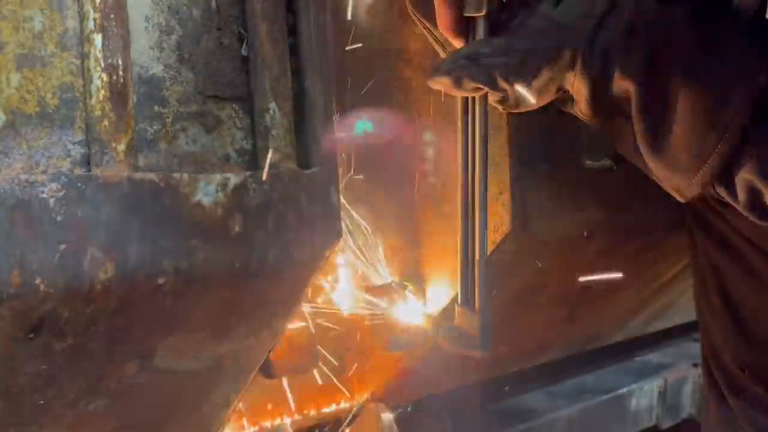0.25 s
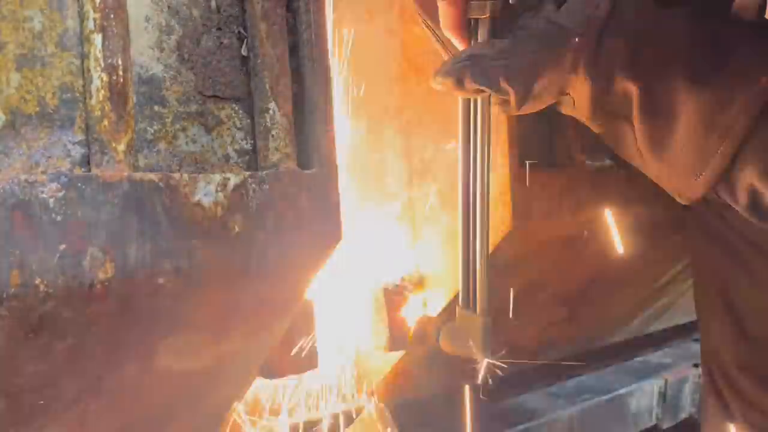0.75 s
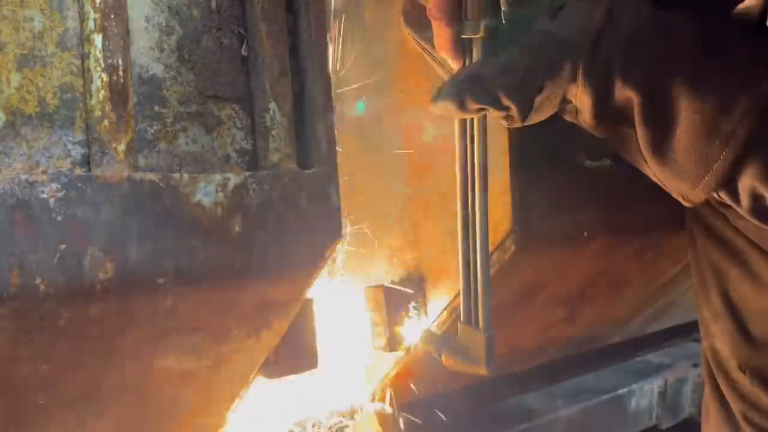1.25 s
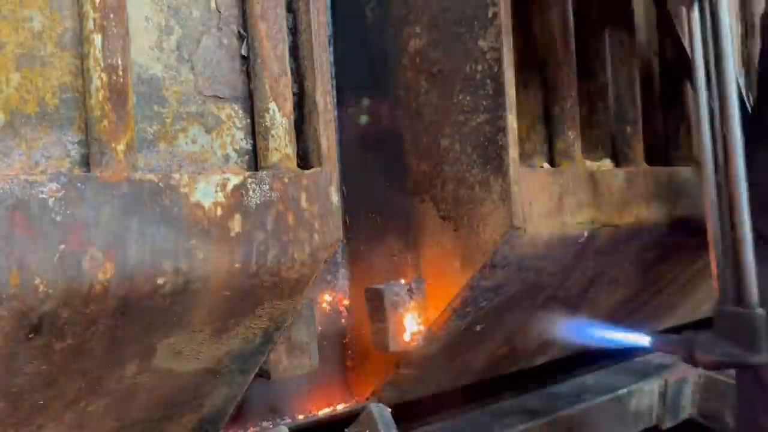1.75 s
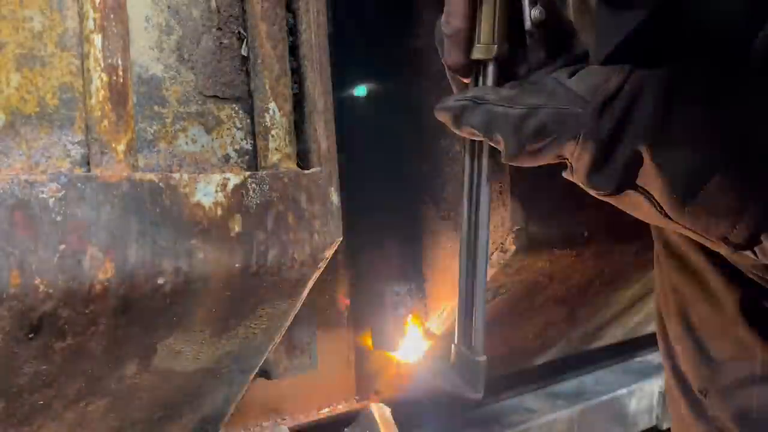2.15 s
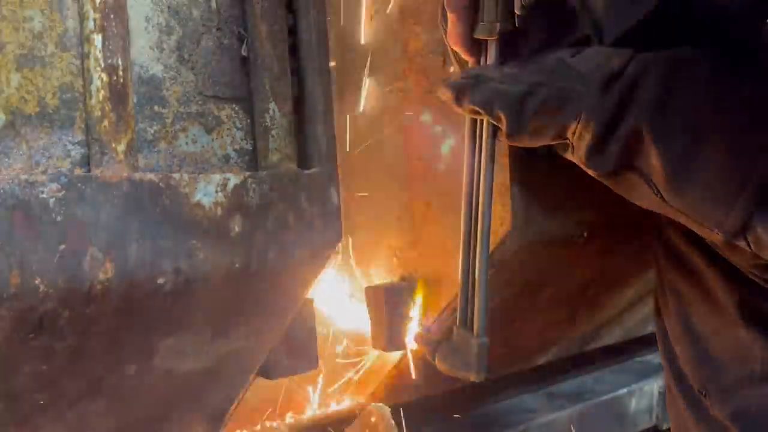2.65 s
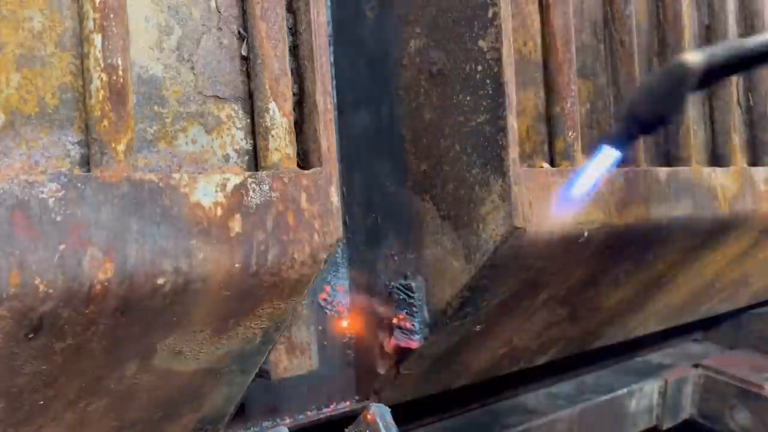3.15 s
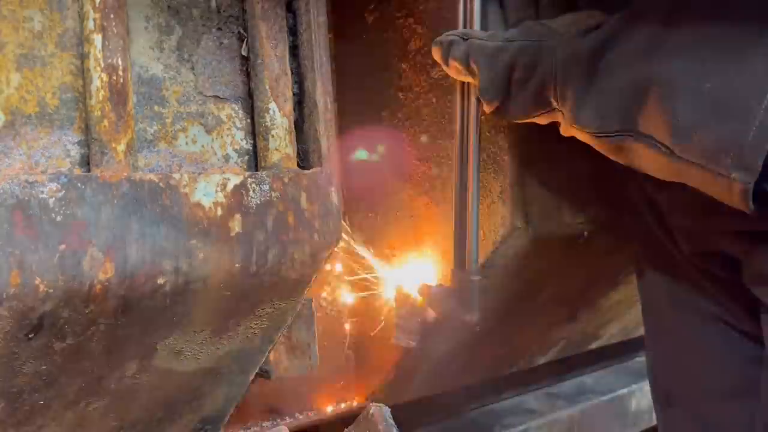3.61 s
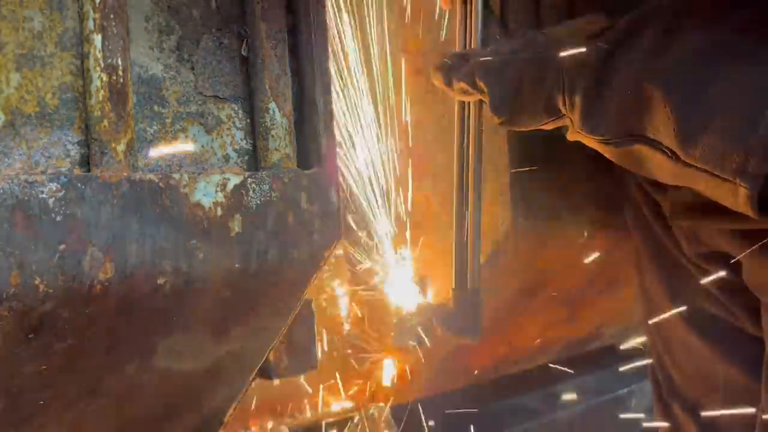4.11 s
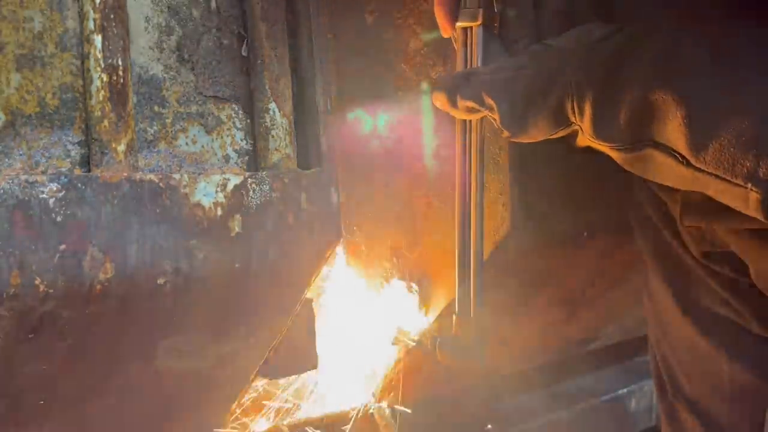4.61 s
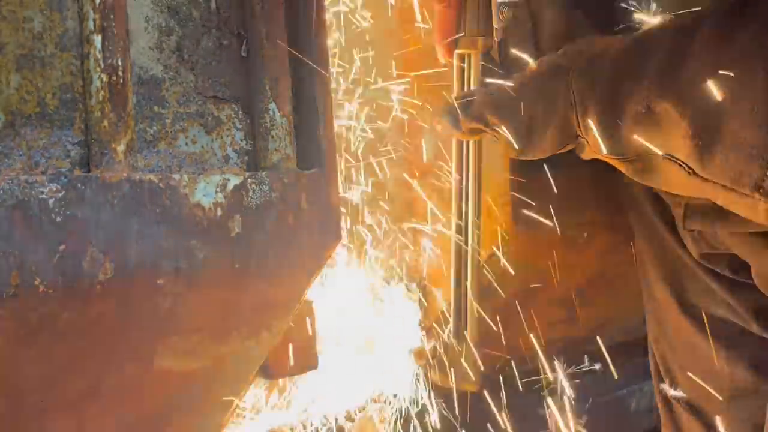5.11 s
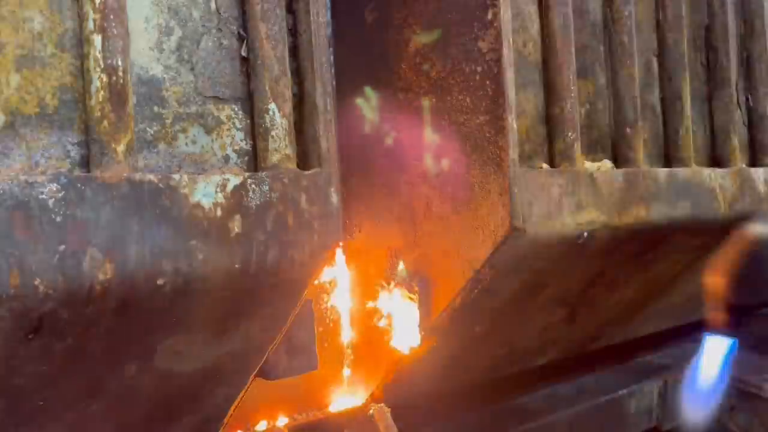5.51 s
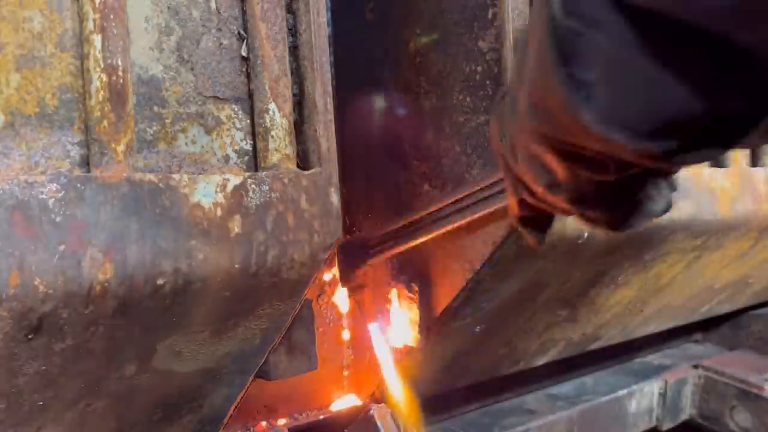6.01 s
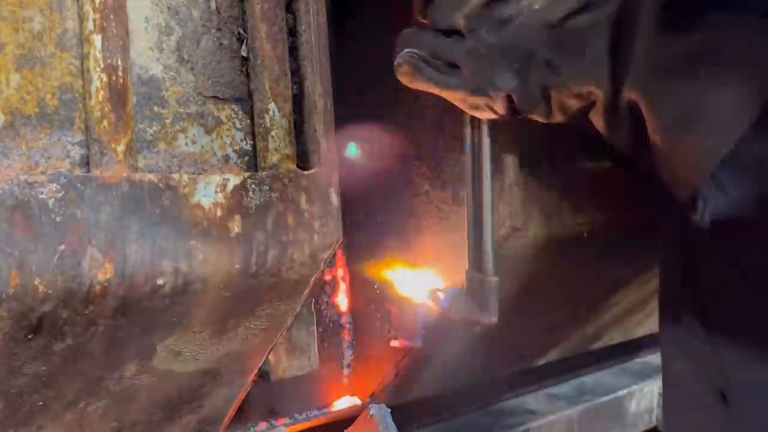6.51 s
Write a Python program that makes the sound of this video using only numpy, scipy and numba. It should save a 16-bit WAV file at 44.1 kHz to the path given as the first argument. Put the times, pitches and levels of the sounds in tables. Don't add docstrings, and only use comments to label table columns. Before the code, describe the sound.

A gas cutting torch hisses without pause close to a phone microphone, bright and thin in the bass. At 0.23 s a tight cluster of backfire pops snaps, ringing the steel briefly. Short breathy whistles rise near 0.5 and 0.75 s, then faint wavering tones and soft slag sputters run beneath the hiss. At 1.7 s the torch is pulled clear and the hiss opens with a swishing echo; whistles chirp at 2.2 s as cutting resumes. It draws away again around 2.8 to 3.25 s, then a singing tone swells and a longer whistle climbs from 3.57 s. Hard cracks hit at 3.95 and 4.02 s, another at 4.64 s, with sputtering around them. From 5.4 s the flame plays in the open, louder, airy and shifting, with sharp tiny ticks at 6.03 and 6.26 s. It re-enters the slot about 6.5 s, singing, then whistling nearly level from 6.7 s.

```python
import sys
import numpy as np
from scipy import signal
from scipy.fft import rfft, irfft, next_fast_len
from scipy.io import wavfile
from scipy.ndimage import uniform_filter1d, map_coordinates
from numba import njit

SR = 44100
rng = np.random.default_rng(int(sys.argv[2]) if len(sys.argv) > 2 else 0)


def bounce(signal):
    frames = np.transpose(np.atleast_2d(signal))
    limited = np.clip(frames, -1, 1)
    pcm = np.round(limited * 32767).astype(np.int16)
    wavfile.write(sys.argv[1], SR, pcm)


def magnitude_from_level(level_db):
    exponent = np.asarray(level_db, float) / 20
    return 10 ** exponent


N = 298113
TIME = np.arange(N) / SR
SIZE = next_fast_len(N + 8192)
HZ = np.maximum(np.arange(SIZE // 2 + 1) * SR / SIZE, 1)


def unit(x):
    return x / np.sqrt(np.mean(np.atleast_2d(x)[0] ** 2))


def shape(x, gain):
    return irfft(rfft(x, SIZE) * gain, SIZE)[..., :N]


def spectrum(points):
    hz, db = np.transpose(points)
    return magnitude_from_level(np.interp(np.log(HZ), np.log(hz), db))


@njit
def svf(x, hz, width):
    y, band, low = np.empty(len(x)), 0., 0.
    for i in range(len(x)):
        g = np.tan(np.pi * hz[i] / SR)
        k = width / hz[i]
        v = (band + g * (x[i] - low)) / (1 + g * (g + k))
        band, low, y[i] = 2 * v - band, low + 2 * g * v, k * v
    return y


def walk(rate):
    k = int(SR / rate)
    steps = np.repeat(rng.standard_normal(N // k + 1), k)
    return 0.764 * uniform_filter1d(uniform_filter1d(steps, k), k)[:N]


# start in seconds, length in seconds, lowest first notch of the
# plate echo in Hz, echo share from 0 to 1, left minus right in dB.
DRAWN_CLEAR = [
    (1.66, .26, 5800, .5, -2),
    (2.78, .27, 4550, .55, -2.5),
    (2.94, .35, 4450, .55, -2.5),
    (5.37, .29, 3950, .45, -3),
    (5.58, .9, 6900, .35, .5),
    (5.82, .32, 4400, .3, .1),
    (6.3, .19, 6100, .45, .1),
]


def reach():
    draw_s = .04
    start, length = np.transpose(DRAWN_CLEAR)[:2, :, None]
    ways = (TIME - start, start + length - TIME)
    out = np.prod([1 - np.exp(-np.maximum(t, 0) / draw_s) for t in ways], axis=0)
    return out / out.max(axis=1, keepdims=True)


def plate_echo(x):
    at_plate_hz = 9500
    notch_hz, share = np.transpose(DRAWN_CLEAR)[2:4, :, None]
    out = reach()
    share = np.max(share * np.sqrt(out), axis=0) * (1 + .3 * walk(25))
    delay_s = np.max(1 / at_plate_hz + (1 / notch_hz - 1 / at_plate_hz) * out, axis=0)
    lag = SR * delay_s * (1 + .025 * walk(30) + .05 * walk(9))

    def delayed(path):
        return np.array([map_coordinates(row, [np.arange(N) - path * lag], order=2) for row in x])

    echoed = x - .8 * share * delayed(1) + .45 * share * delayed(1.7) - .4 * share * delayed(2.6)
    return echoed / np.sqrt(1 + .75 * share ** 2)


# start in seconds, gas level in dB, depth in the slot
# from 0 to 1, steel burning in dB.
MOVES = [(0, -39, 0.7, -5), (.26, -43.5, 0.64, -6.5), (.33, -44.5, 1, -6.5), (.52, -43.5, .97, -7.5),
         (.735, -39, 0.9, -5.5), (.84, -40.5, 0.72, -6.5), (1.2, -41, 0.68, -6.5), (1.68, -37, 0.4, -13),
         (1.9, -40, 0.7, -8), (1.98, -33.5, .43, -14), (2.05, -37, 0.63, -10.5), (2.2, -38.5, 0.56, -7.5),
         (2.38, -39.5, 0.86, -4.5), (2.53, -40, 0.68, -8.5), (2.81, -39, 0.32, -14), (3.05, -38, 0.25, -15),
         (3.17, -36, 0.34, -14.5), (3.26, -37, .93, -12.5), (3.58, -34.5, 0.72, -16.5),
         (3.7, -37, .64, -15), (3.83, -40, 0.83, -7), (4.23, -40.5, 0.75, -9), (4.92, -35.5, 0.51, -10.5),
         (5.35, -38.5, 0.56, -15.5), (5.5, -37, 0.26, -16), (5.76, -35.5, 0.5, -13), (6.14, -35, 0.36, -13),
         (6.32, -34.5, 0.43, -14.5), (6.47, -37, 0.93, -11.5), (6.72, -35, 0.87, -14)]
# start in seconds, length in seconds, gain in dB.
LEVER = [
    (0.244, .07, 4.5),
    (0.455, 0.29, 3.5),
    (1.69, 0.3, 2.5),
    (1.926, 0.275, -4.5),
    (2.298, 0.22, 3.5),
    (3.58, 0.37, 4.5),
    (3.974, 0.21, 3.5),
    (6.132, .17, 4),
    (6.702, .1, 3.5),
]
# centre in seconds, half length in seconds, gain in dB, share in the low
PUFFS = [(0.018, 0.076, 2.5, 1), (.75, 0.015, 1.5, 0.9), (1.7, 0.011, 2.5, 0.5), (1.812, 0.067, -2, 1),
         (1.864, 0.049, 3.5, 0.8), (1.91, 0.013, -7, .3), (2.238, 0.027, 4, 0.8), (2.684, 0.035, -3, 0.9),
         (2.74, 0.018, 6, 0.3), (2.782, 0.0078, -8, 0), (2.99, 0.035, -3.5, 0.3), (3.272, 0.036, 3.5, 0.8),
         (3.32, 0.012, -6, 0.4), (3.38, 0.034, 2, 0.8), (3.446, 0.02, -3.5, .6), (3.905, .03, -4, 0.4),
         (4.066, 0.067, 1, 1), (4.61, .03, -3, 0), (4.737, 0.037, 3, 0.6), (4.82, 0.04, -1.5, 1),
         (4.987, 0.05, -1, 1), (5.135, 0.092, -2.5, 1), (5.33, .03, -2, .8), (5.367, 0.01, -11, 0.2),
         (5.39, 0.027, 3.5, 1), (5.984, 0.0088, 6.5, 0.65), (6.257, 0.019, 2, 0.7),
         (6.442, 0.047, 2.5, 0.9), (6.508, 0.028, -3.5, 0.8), (6.594, 0.016, 2, .8)]
# roar, rush, sizzle, hiss in dB.
REGISTER_DB = [-0.07, -3.5, 2.5, 2.5]
DEPTH_DB = [-0.17, 4.5, -9, -1.1]


def register_levels():
    move_samples = int(0.025 * SR)
    starved_db, relight_s = -7.5, 0.021
    start, *held = np.transpose(MOVES)
    move = np.searchsorted(start, TIME, side="right") - 1
    gas, depth, burn = uniform_filter1d(np.array(held)[:, move], move_samples)
    starved = [(TIME > s) * np.exp(-abs(TIME - s) / relight_s) * magnitude_from_level(db) for s, db, *_ in CRACKS]
    gas = gas + starved_db * np.max(starved, axis=0)
    db = gas + np.array(REGISTER_DB)[:, None] + np.outer(DEPTH_DB, depth)
    db[0] += burn
    jet = sum(gain * ((TIME > s) & (TIME < s + length)) for s, length, gain in LEVER)
    db[3] += uniform_filter1d(jet, move_samples)
    for s, half, gain, low in PUFFS:
        db += np.outer([low, low, 1, 1], gain * np.exp(-((TIME - s) / half) ** 2))
    return db


EDGES_HZ = [1600, 5200, 10500]
# frequency in Hz, density in dB per Hz.
COLOUR = [(150, -12.5), (450, -7), (633, -2.5), (839, -2), (1930, -7.5), (2960, -4), (4100, -3.5),
          (5130, -2.5), (5950, 2.5), (8120, 0), (14300, 8.5), (15600, 7)]
# frequency in Hz, side minus mid in dB.
WIDTH = [(60, -7), (110, -13), (200, -23), (380, -22), (700, -24.5), (1290, -31), (2380, -20.5),
         (4400, -10), (8120, -11.5), (15000, -6.5)]
# centre in Hz, width in Hz, gain in dB.
SLOT = [(1950, 500, 7), (2450, 640, 9.5), (4026, 820, 9), (5950, 790, 4), (7460, 930, 8.5),
        (5380, 410, -8.5), (8600, 450, 3.5), (10400, 680, -3), (13950, 3000, 3.5)]
# centre in Hz, width in Hz, gain in dB.
OPEN = [(2000, 660, 9), (3190, 550, 6), (3950, 570, 5), (4680, 730, -3.5), (5650, 500, 3), (6500, 300, 2.5),
        (8700, 1700, 4), (13400, 1200, 2.5)]


def resonances(peaks):
    return magnitude_from_level(sum(db / (1 + (2 * (HZ - hz) / width) ** 2) for hz, width, db in peaks))


def flame():
    level_db = register_levels()
    gain = spectrum(COLOUR) * np.array([np.ones_like(HZ), spectrum(WIDTH[1:])])
    gas = rfft(rng.standard_normal((2, SIZE))) * gain
    clear = np.pad(reach().max(axis=0), (0, SIZE - N))
    in_slot = irfft(gas * resonances(SLOT), SIZE)
    in_open = irfft(gas * resonances(OPEN), SIZE)
    gas = rfft((1 - clear) * in_slot + clear * in_open)
    above = [1 / (1 + (hz / HZ) ** 16) for hz in EDGES_HZ]
    splits = -np.diff([np.ones_like(HZ), *above, np.zeros_like(HZ)], axis=0)
    flutter, spit = walk(30), walk(160)
    unrest_db = [(0.81, 3.9, 1.6), (0.091, 0.92, 0.26), (1.8, 2.03, 0.36), (0.25, 1.2, 0.43)]
    out = 0
    for k, (split, db, (slow, quick, own)) in enumerate(zip(splits, level_db, unrest_db)):
        band = irfft(gas * np.sqrt(split), SIZE)[:, :N]
        if k > 1:
            band = plate_echo(band)
        out = out + unit(band) * magnitude_from_level(db + slow * flutter + quick * spit + own * walk(18))
    return out


def phrase(notes, onset_db, peak_at, end_db, bend):
    u = np.linspace(0, 1, num=17)
    swell = np.interp(u, [0, peak_at, 1], [onset_db, 0, end_db])
    return [np.transpose([s + length * u, first + (last - first) * u ** bend, db + swell])
            for s, length, first, last, db in notes]


def edge_tone(notes, width, octave_db, breath):
    out, waver = np.zeros(N), walk(150)
    for rows in notes:
        s, hz, db = np.transpose(rows)
        on = (TIME > s[0]) & (TIME < s[-1])
        pitch = np.interp(TIME[on], s, hz)
        phase = 2 * np.pi * np.cumsum(pitch + width / 2 * waver[on]) / SR
        note = 0
        for k, row in enumerate(rng.standard_normal((2, on.sum())), start=1):
            air = unit(svf(row, k * pitch, k * width))
            tone = np.sqrt(2 - 2 * breath ** 2) * np.sin(k * phase)
            note = note + magnitude_from_level(octave_db * (k - 1)) * (breath * air + tone)
        fade = signal.windows.tukey(on.sum(), min(0.049 / (s[-1] - s[0]), 1))
        out[on] += note * fade * magnitude_from_level(np.interp(TIME[on], s, db) - 3.5)
    return out


# start in seconds, length in seconds, first Hz, last Hz, level in dB.
RUSH = [
    (3.02, 0.21, 5550, 5950, -41.5),
    (5.8, 0.28, 3800, 3920, -37),
    (6.0, 0.15, 3930, 3850, -36.5),
    (6.2, .26, 3950, 3950, -40.5),
]


def edge_rush():
    notes = phrase(RUSH, onset_db=2, peak_at=0.35, end_db=0, bend=2.1)
    return edge_tone(notes, width=800., octave_db=-20, breath=1)


# start in seconds, length in seconds, first Hz, last Hz, level in dB.
SINGING = [
    (.3, 0.45, 1900, 1915, -43.5),
    (1.65, .27, 1880, 1975, -42),
    (1.92, 0.38, 1940, 1930, -42),
    (3.16, 0.39, 1950, 1947, -34.5),
    (6.38, 0.174, 1950, 2035, -36.5),
    (6.55, 0.18, 2010, 1940, -35.5),
]


def singing_flame():
    notes = phrase(SINGING, onset_db=-6, peak_at=0.99, end_db=-17, bend=1.275)
    return edge_tone(notes, width=140., octave_db=-20, breath=.75)


# start in seconds, length in seconds, first Hz, last Hz, level in dB.
LOCKED = [
    (.57, .15, 1886, 1930, -48),
    (.84, .1, 1320, 1440, -46),
    (.93, .1, 1510, 1470, -47),
    (1.1, 0.11, 1480, 1524, -47),
    (1.25, .29, 1515, 1490, -47),
    (1.57, 0.11, 1500, 1440, -48),
    (2.54, .1, 1510, 1494, -52),
    (2.68, 0.11, 1520, 1493, -49.5),
]


def locked_whistle():
    out, waver = np.zeros(N), walk(60) + 1.45 * walk(14)
    for rows in phrase(LOCKED, onset_db=-3, peak_at=.4, end_db=-3, bend=0.96):
        s, hz, db = np.transpose(rows)
        on = (TIME > s[0]) & (TIME < s[-1])
        phase = 2 * np.pi * np.cumsum(np.interp(TIME[on], s, hz) + 22 * waver[on]) / SR
        fade = signal.windows.tukey(on.sum(), .2)
        out[on] = np.sqrt(2) * np.sin(phase) * fade * magnitude_from_level(np.interp(TIME[on], s, db))
    return out


# start in seconds, length in seconds, first Hz, last Hz, level in dB.
WHISTLE = [
    (.472, 0.05, 1203, 1300, -31.5),
    (.727, 0.17, 1204, 1487, -34.5),
    (2.195, 0.077, 1260, 1350, -28.5),
    (2.27, 0.1, 1270, 1420, -31.5),
    (3.565, 0.32, 1253, 1480, -29.5),
    (6.712, 0.31, 1207, 1220, -29.5),
]


def jet_whistle():
    notes = phrase(WHISTLE, onset_db=-13, peak_at=0.067, end_db=-13, bend=2.6)
    return edge_tone(notes, width=180., octave_db=-2, breath=.73)


def bursts(events, spread, trim_db):
    out = np.zeros(N)
    noise = rng.standard_normal((len(events), 4096))
    t = np.arange(4096) / SR
    for (s, db, hz, ms), row in zip(events, noise):
        puff = unit(svf(row, np.full(4096, float(hz)), spread * hz))
        u = t / (ms / 1000)
        envelope = (1 - np.exp(-8 * u)) * np.exp(-u ** 2)
        start = int(s * SR)
        out[start:start + 4096] += (puff * envelope * magnitude_from_level(db + trim_db))[:N - start]
    return out


# start in seconds, peak in dB, centre in Hz, length in milliseconds.
SPUTTER = [(0.087, -25.5, 616, 20), (0.181, -19, 2120, 8), (0.872, -28, 1360, 6.4), (0.991, -27, 3880, 13),
           (1.092, -23.5, 1330, 14), (1.119, -21.5, 640, 10.4), (1.154, -26, 1410, 13),
           (1.326, -24.5, 1490, 14), (2.283, -20.5, 2540, 16), (2.366, -20.5, 920, 17),
           (2.5, -28.5, 711, 20), (2.602, -28, 1960, 6.5), (2.632, -16.5, 2450, 5), (2.726, -25, 2280, 21),
           (4.0485, -12.5, 2530, 7.5), (4.205, -15, 2110, 4.7), (4.747, -23, 2200, 8.9),
           (4.853, -25, 2000, 5.7), (4.929, -21, 3620, 9.1), (4.992, -24.5, 550, 16),
           (5.1, -20.5, 1770, 5.9), (5.276, -21.5, 1820, 22), (5.309, -22.5, 2460, 12),
           (6.574, -22.5, 2190, 13)]


def slag_sputter():
    return bursts(SPUTTER, spread=0.87, trim_db=-9.0)


# start in seconds, peak in dB, centre in Hz, length in milliseconds.
SPARKS = [
    (1.6194, -23, 11000, 3.5),
    (2.7686, -23, 13200, 3),
    (5.8304, -22, 12700, 3),
    (5.8636, -20, 14500, 3),
    (5.979, -26, 12700, 3.6),
    (6.034, -12, 12800, 2),
    (6.2124, -24, 13400, 3),
    (6.2592, -12, 13000, 3),
]


def spark_ticks():
    return bursts(SPARKS, spread=0.15, trim_db=-5)


# start in seconds, strength in dB, top in Hz, ring in the steel in dB,
# push 1 or suck -1.
CRACKS = [
    (.23165, -4, 6000, -10, -1),
    (.23218, -3, 3400, -6, 1),
    (.2342, -17, 2600, -20, 1),
    (.236, -2, 4200, -14, 1),
    (3.95335, -3, 3800, 0, -1),
    (4.01625, -4, 4000, -4, -1),
    (4.0206, -22, 3000, -16, -1),
    (4.64022, -5, 6000, -14, -1),
    (4.642, -1, 4400, -4, -1),
    (4.64378, -4, 3600, -16, 1),
]
# frequency in Hz, level in dB, 60 dB decay time in seconds.
STEEL = [
    (427, -6.5, 0.12),
    (490.6, 2.5, 0.081),
]


def backfires():
    out, t = np.zeros(N), np.arange(8192) / SR
    lead_s = 0.00419
    ring = sum(magnitude_from_level(db) * np.sin(2 * np.pi * hz * (t + lead_s)) * np.exp(-np.log(1000) * t / t60)
               for hz, db, t60 in STEEL)
    ring = ring * (1 - np.exp(-t / 0.0017))
    for s, db, top_hz, ring_db, push in CRACKS:
        u = 2 * np.pi * top_hz * t
        pulse = np.exp(-(u - 4) ** 2 / 2) + 0.16 * u * np.exp(-u / 4)
        start = int(s * SR)
        out[start:start + 8192] += push * magnitude_from_level(db + 7.5) * pulse + magnitude_from_level(ring_db - 16.5) * ring
    return out


def scene():
    mid, side = flame()
    mid = mid + edge_rush() + singing_flame() + locked_whistle() + jet_whistle()
    mid = mid + slag_sputter() + spark_ticks()
    cracks = backfires()
    cracks = np.array([cracks, magnitude_from_level(0.6) * np.roll(cracks, 1)])
    pan_db = 0.5 + np.transpose(DRAWN_CLEAR)[4] @ reach()
    return (mid + np.array([side, -side])) * magnitude_from_level(np.array([pan_db, -pan_db]) / 2) + cracks


def roll_off(x):
    return signal.sosfilt(signal.butter(12, 17080, fs=SR, output="sos"), x)


def record(dry):
    bass_hz, leak_db = 430, -31
    lag_cycles, ceiling = 1.25, .85
    trail = np.exp(-2j * np.pi * lag_cycles * np.log((HZ + 60) / 16000))
    bass_cut = 1 / np.sqrt(1 + (bass_hz / HZ) ** 10) + magnitude_from_level(leak_db)
    top_cut = 1 / (1 + (HZ / 15980) ** 400)
    heard = shape(dry, trail * bass_cut)
    heard = shape(ceiling * np.tanh(heard / ceiling), top_cut)
    return roll_off(heard)


dry = scene()
out = record(dry)
bounce(out)
```